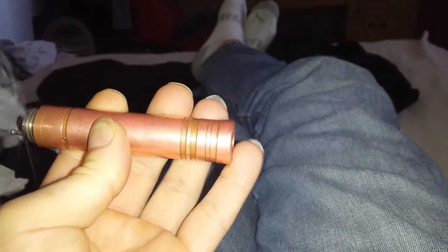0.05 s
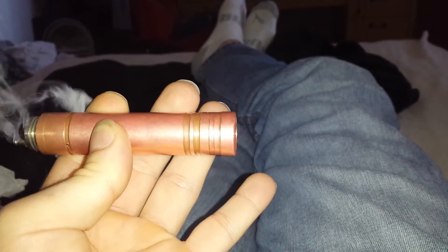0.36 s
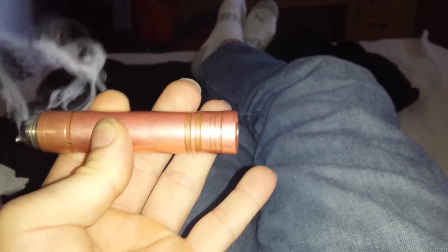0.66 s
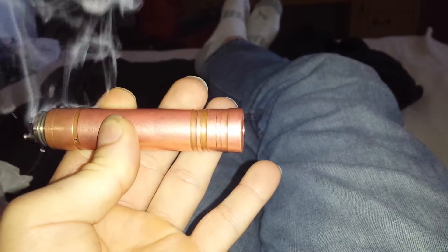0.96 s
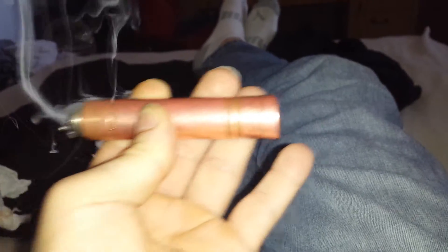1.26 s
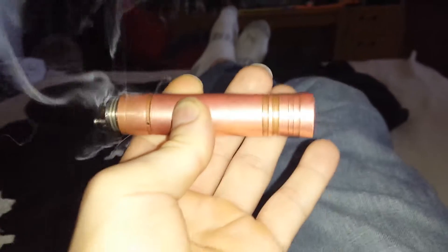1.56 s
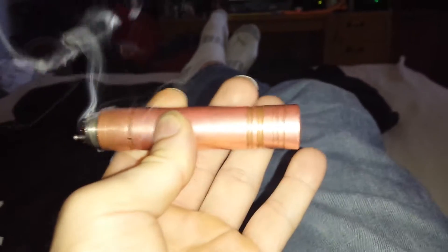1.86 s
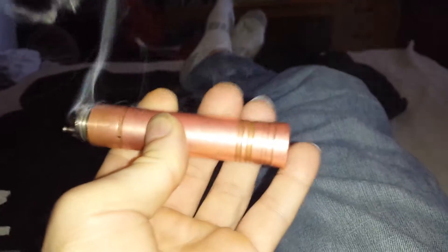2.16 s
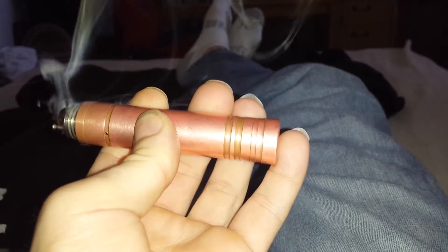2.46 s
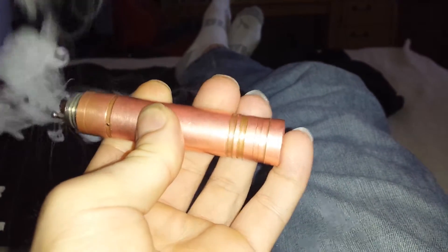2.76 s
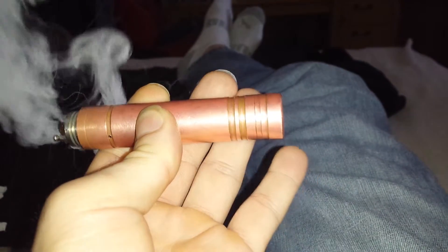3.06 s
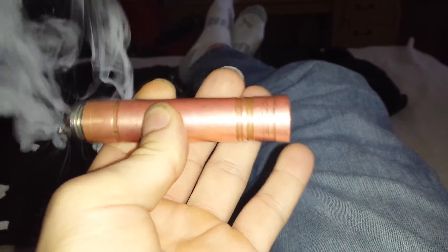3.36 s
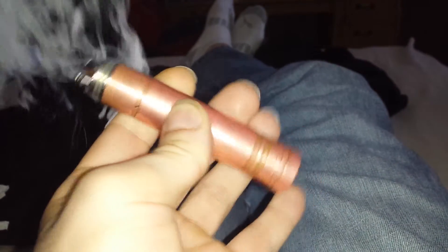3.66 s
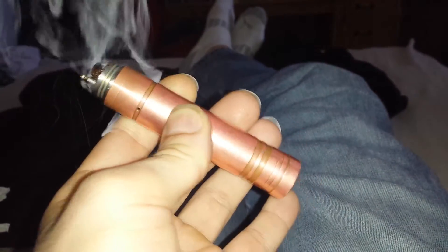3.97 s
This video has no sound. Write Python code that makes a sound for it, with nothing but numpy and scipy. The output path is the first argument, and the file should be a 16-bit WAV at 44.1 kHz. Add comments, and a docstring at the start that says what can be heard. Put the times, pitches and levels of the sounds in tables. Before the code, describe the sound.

Close up in a quiet room, a vape coil crackles and pops, fades to a soft hiss, then sizzles again more strongly. There are a few soft hand bumps, while an engine drones through the walls, eases off and builds.

```python
"""The wet coil of a hand-held vape sizzles close by in a quiet room and spits sharp pops as drops of liquid
burst. It dies down while a sleeve slides softly over denim, then is fired again at about 2.5 s and pops some
more. The hand bumps softly a few times. Behind it drones what seems to be an engine outside, muffled by the
walls: it pulls, eases off, then pulls again and grows louder."""
import sys
import numpy as np
from scipy import signal
from scipy.fft import rfft, irfft
from scipy.io import wavfile

SR = 44100
rng = np.random.default_rng(int(sys.argv[2]) if len(sys.argv) > 2 else 0)


def transcribe(u):
    """Save the signal u as a 16-bit wav file named by the first command-line argument.

    u: samples, shape (n,) or (channels, n), limited to [-1, 1]; the rate is SR.
    q: integer samples, one column per channel.
    """
    v = np.clip(np.atleast_2d(u).T, -1, 1)
    q = np.round(v * 32767).astype(np.int16)
    wavfile.write(sys.argv[1], SR, q)


N = 176400
T = np.arange(N) / SR
COIL_LEFT_LAG_S = 0.00024
# How hard the coil boils. Each row: time in seconds, level in dB.
BOIL = [(0, -53.5), (.1, -50.5), (.18, -50), (.23, -56), (.4, -58), (.7, -63), (1.15, -61), (1.45, -58),
        (1.66, -67), (2.3, -79), (2.42, -56.5), (2.58, -51), (2.8, -44), (2.92, -44.5), (3.1, -46),
        (3.5, -47.5), (3.62, -47.5), (3.75, -49.5), (4, -54)]


def amp(db):
    """Decibels to gain."""
    return 10 ** (np.asarray(db) / 20)


def unit(x):
    """Scales to rms 1."""
    return x / np.sqrt(np.mean(x ** 2) + 1e-20)


def curve(table, column=1):
    """One column of a time table, at every sample."""
    rows = np.array(table)
    return np.interp(T, rows[:, 0], rows[:, column])


def spectrum(table, size, column=1):
    """One dB column of a spectrum table, as gains on FFT bins."""
    rows = np.array(table)
    log_hz = np.log(np.fft.rfftfreq(size, 1 / SR) + 1)
    return amp(np.interp(log_hz, np.log(rows[:, 0]), rows[:, column]))


def colour(x, table, column=1):
    """Filters by one column of a spectrum table."""
    return irfft(rfft(x) * spectrum(table, N, column), N)


def noise(table, column=1):
    """Noise with the given spectrum."""
    return colour(rng.standard_normal(N), table, column)


def drift(hz):
    """Random movement of rms 1, rolling off around hz."""
    rolloff = (1 + (np.fft.rfftfreq(N, 1 / SR) / hz) ** 2) ** 2
    return unit(irfft(rfft(rng.standard_normal(N)) / rolloff, N))


def later(x, delay_s):
    """Delays a sound."""
    return np.pad(x, (round(delay_s * SR), 0))[:len(x)]


def add(track, centre_s, sound):
    """Mixes in a short sound centred on a time."""
    start = round(centre_s * SR) - len(sound) // 2
    track[start:start + len(sound)] += sound


def sizzle(hand_echo_s=0.0017, hand_echo_db=-14, shared=0.45):
    """Countless tiny bubbles merge into a fluttering hiss that follows the boil."""
    # Each row: frequency in Hz, left gain in dB, right gain in dB.
    bands = [(300, -6, -4), (1200, -8.5, -7.5), (2040, -5, -3), (2800, -2, -10), (3440, -10.5, -10),
             (4430, -2.5, -6), (4900, -2, -1), (5030, -0.5, -6), (6170, -0.5, -1), (7100, -7, -1.5),
             (8340, -16, -0.5), (9540, -17, -5.5), (9900, -11, -3), (11700, -14, -5.5), (14400, -21, -8),
             (14800, -50, -40)]
    white = rng.standard_normal((2, N))
    direct, scattered = [side + amp(hand_echo_db) * later(side, hand_echo_s) for side in white]
    left = shared * later(direct, COIL_LEFT_LAG_S) + np.sqrt(1 - shared ** 2) * scattered
    hiss = unit(np.array([colour(left, bands, column=1), colour(direct, bands, column=2)]))
    flutter_db = 0.56 * drift(hz=150) + 0.5 * drift(hz=44)
    return hiss * amp(curve(BOIL) + flutter_db)


def engine_drone():
    """Harmonics of the firing cycle, each wavering in level."""
    # Each row: time in seconds, cycle rate in Hz, levels of harmonics 2, 3 and 4 in dB.
    firing = [(0.0, 46.99, -71, -51, -89), (0.23, 48.14, -55.5, -59, -70), (0.37, 49.55, -44, -45.5, -60),
              (0.51, 50.82, -48, -56, -53), (0.58, 50.82, -41, -54, -80), (0.61, 50.27, -39.5, -43, -49),
              (0.76, 50.8, -34, -48, -42.5), (0.83, 51.42, -35, -46, -53), (0.92, 51.88, -37.5, -42.5, -40),
              (1.1, 50.77, -37.5, -53, -46), (1.15, 51.71, -33.5, -60, -65), (1.18, 51.61, -36.5, -58, -48),
              (1.25, 51.7, -35.5, -44.5, -38.5), (1.41, 51.27, -43.5, -50.5, -50),
              (1.46, 50.39, -51, -52, -44), (1.53, 49.91, -48, -79, -61), (1.57, 44.39, -53, -45, -51),
              (1.76, 44.2, -59, -53, -53), (2.03, 45.07, -61, -54, -56.5), (2.36, 47.12, -59, -45, -58),
              (2.62, 48.66, -37, -47.5, -52), (2.85, 49.66, -40.5, -48, -42), (3.15, 50.5, -39.5, -55, -38),
              (3.31, 51.24, -37.5, -41.5, -46), (3.53, 52.1, -32.5, -42, -30),
              (3.9, 53.57, -27.5, -34.5, -26), (4.0, 53.46, -28.5, -35, -24.5)]
    # Each row: time in seconds, levels of harmonics 5, 6 and 7 in dB.
    middle = [(0, -69, -73, -80), (.5, -61, -63.5, -64), (1, -55.5, -60, -62.5), (1.5, -60, -58.5, -67.5),
              (2.1, -59, -63.5, -56), (2.5, -55, -57, -58), (2.95, -47, -63, -63),
              (3.25, -44.5, -61, -40.5), (3.45, -66, -37.5, -45.5), (3.6, -55, -39.5, -42.5),
              (3.85, -41, -29.5, -34.5), (4, -54, -34.5, -35.5)]
    # Upper harmonics. Each row: time in seconds, common level in dB.
    upper_level = [(0, -71), (.5, -61), (.95, -53), (1.4, -61), (1.7, -62), (2.1, -59), (2.6, -47),
                   (3, -38), (3.2, -35), (3.45, -33.5), (3.6, -31), (3.85, -30), (4, -32)]
    # Each row: harmonic number, offset from that level in dB.
    upper = [(8, -23.5), (9, -20), (11, -25.5), (13, -28), (16, -28), (18, -28), (19, -26), (25, -27)]
    cycles = np.cumsum(curve(firing)) / SR

    def harmonic(k, db, waver_db):
        peak = np.sqrt(2) * amp(db + waver_db * drift(hz=5))
        return peak * np.sin(2 * np.pi * (k * cycles + rng.random()))

    drone = sum(harmonic(k, curve(firing, column=k), waver_db=1.2) for k in (2, 3, 4))
    drone += sum(harmonic(k, curve(middle, column=k - 4), waver_db=2) for k in (5, 6, 7))
    return drone + sum(harmonic(k, curve(upper_level) + db, waver_db=2) for k, db in upper)


def vehicle(drone_db=-1.5, bass_lag_s=0.00016, rush_pan_db=2):
    """The engine's drone over a low rumble and a diffuse rush, muffled by the walls."""
    # Each row: time in seconds, rumble level in dB, rush level in dB.
    levels = [(0, -56, -72), (.35, -57, -69), (.52, -51, -63.5), (.68, -55.5, -63.5), (.95, -48.5, -64),
              (1.25, -54, -55.5), (1.45, -55, -63), (1.65, -52, -64.5), (1.9, -51, -57), (2.15, -51, -60),
              (2.4, -48.5, -61), (2.8, -40.5, -53), (3.2, -40.5, -48.5), (3.5, -38.5, -45.5),
              (3.8, -34, -44), (4, -39, -44.5)]
    # Noise spectra. Each row: frequency in Hz, gain in dB.
    rumble_bands = [(20, -25), (65, -20), (90, -6.5), (108, 6.5), (124, 2.5), (160, -3.5), (200, -1.5),
                    (238, -1), (280, -4), (318, 2), (345, -2.5), (400, -9), (485, -3.5), (545, -19.5),
                    (900, -25), (2000, -70)]
    rush_bands = [(200, -22), (500, 0), (770, -4), (980, -0.5), (1150, 1.5), (1450, 1), (1750, -5.5),
                  (2100, -7), (3000, -15), (5000, -19), (12000, -50)]
    # Each row: frequency in Hz, left minus right in dB.
    balance = [(60, -10.5), (100, 2), (160, 2.5), (220, -0.25), (450, 0), (800, 0.5)]
    bass = amp(drone_db) * engine_drone() + unit(noise(rumble_bands)) * amp(curve(levels))
    bass_left = later(colour(bass, balance), bass_lag_s)
    rush = unit(np.array([noise(rush_bands), noise(rush_bands)])) * amp(curve(levels, column=2))
    return np.array([bass_left, bass]) + rush * amp([[rush_pan_db], [-rush_pan_db]])


def room_tone(level_db=-58, whine_gain_db=1.5):
    """Steady room noise and faint hiss, with a thin whine on the right."""
    # Each row: frequency in Hz, gain in dB.
    bands = [(20, 11), (100, 16.5), (400, 8.5), (800, 8), (1500, -0.5), (2800, 0.5), (5500, 2.5),
             (8500, -1.5), (14300, -3), (15000, -40)]
    # Each row: frequency in Hz, level in dB.
    whine = [(7510, -78), (8080, -73), (8662, -74), (9254, -73), (9819, -72), (10406, -77)]
    tone = amp(level_db) * unit(np.array([noise(bands), noise(bands)]))
    for hz, db in whine:
        tone[1] += amp(db + whine_gain_db) * np.sqrt(2) * np.sin(2 * np.pi * hz * T + drift(hz=29))
    return tone


def drop(tilt_db_per_octave, ping_hz, pivot_hz=6950, ping_db=-17.5, ping_t60_s=0.0022, size=256):
    """One drop bursts: a click at mid-buffer, then a brief ping at the drop's own pitch."""
    hz = np.clip(np.fft.rfftfreq(size, 1 / SR), pivot_hz / 2, pivot_hz * 2)
    click = np.roll(irfft(amp(tilt_db_per_octave * np.log2(hz / pivot_hz))), size // 2)
    t = T[:size // 2]
    ping = amp(ping_db - 60 * t / ping_t60_s) * np.cos(2 * np.pi * ping_hz * t)
    return click + np.pad(ping, (size // 2, 0))


def snap(size=512):
    """The sharp edge of a pop: a minimum-phase click of peak 1."""
    # Each row: frequency in Hz, gain in dB.
    bands = [(100, -29), (700, -18), (2000, -19), (3500, -10), (5000, -4), (6200, 1), (7800, 4),
             (10500, 4.5), (14000, -7.5), (15500, -20)]
    cepstrum = irfft(np.log(spectrum(bands, size)))
    cepstrum[1:size // 2] *= 2
    cepstrum[size // 2:] = 0
    click = irfft(np.exp(rfft(cepstrum)))
    return click / abs(click).max()


def ring(clicks, modes):
    """Clicks excite decaying modes of alternating sign."""
    t = T[:SR // 40]
    response = sum((-1) ** k * amp(db - 60 * t / t60_s) * np.sin(2 * np.pi * hz * t)
                   for k, (hz, db, t60_s) in enumerate(modes))
    return signal.oaconvolve(clicks, response)[:N]


def room(x, tail_db=-10, t60_s=0.084, rise_s=0.0082):
    """Adds reflections from the body and the furniture, and a short soft tail."""
    # Each row: delay in seconds, gain in dB.
    echoes = [(.0009, -33), (.0062, -43), (.0068, -14.5), (0.009, -48)]
    t = T[:SR // 2]
    tail = rng.standard_normal((2, len(t))) * amp(-60 * t / t60_s) * np.minimum(t / rise_s, 1)
    tail /= np.linalg.norm(tail[0])
    early = np.array([sum(amp(db) * later(side, delay_s) for delay_s, db in echoes) for side in x])
    return x + early + amp(tail_db) * signal.fftconvolve(x, tail, axes=1)[:, :N]


def crackle(per_s=160, offset_db=-1, spread_db=3.5):
    """Small drops burst at random: impulses whose size follows the boil."""
    scatter_db = spread_db * np.minimum(rng.exponential(1, N), 4)
    return amp(offset_db + curve(BOIL) + scatter_db) * (rng.random(N) < per_s / SR)


def pops(drop_gain_db=3, lead_s=0.001182):
    """Bursting drops ring and snap, the snap strongest on the right; large ones click twice and knock."""
    # Each row: start in seconds, level in dB, first click and knock in dB re the main click,
    # tilt in dB per octave, ping in Hz.
    large_drops = [(.0298, -37, -3, -26, -2, 7000), (0.106, -29, -16, -2, 0, 6960),
                   (.1215, -39, -3, -6, 0, 6000), (0.1445, -35.5, -8, -10, 3, 7000),
                   (0.1652, -25.5, -6.5, -5, -3, 7200), (0.1758, -38, -3, -9, -5, 6500),
                   (2.371, -39, -21, -2, -3, 4500), (2.5776, -29.5, -8, -8, -1.5, 5300),
                   (2.6589, -31.5, -14, -17, -1, 8200), (2.7302, -32, -4, 0, -1, 8000),
                   (2.7828, -17, -11, -6.5, 4, 4830), (2.8774, -22.5, -11, -12, -4, 8300),
                   (2.8983, -18.5, -15, -24, 0, 7900), (2.9374, -31.5, -12, -14, 0, 8250),
                   (3.0049, -30, -10, -4, -3, 7800), (3.1383, -39, -12, 0, -5, 5000),
                   (3.2251, -23.5, -20, -11, -7, 8550), (3.3912, -25.5, -20, -8, -7, 5070),
                   (3.4431, -34, -12, -14, -7, 4800), (3.5874, -16.5, -16, -11, 0.5, 11900)]
    # Bright ring and dull knock. Each row: frequency in Hz, gain in dB, T60 in seconds.
    ring_modes = [(2550, -23.5, 0.0095), (4510, -13, 0.0042), (5700, -9, 0.0032), (7230, -7.5, 0.00088),
                  (11100, -14.5, 0.0027)]
    knock_modes = [(430, -19.5, 0.016), (701, -20.5, 0.033), (1250, -24.5, 0.021), (2050, -21, 0.019),
                   (2600, -13.5, 0.0011)]
    bursts, knocks = crackle(), np.zeros(N)
    for start_s, db, first_db, knock_db, tilt_db_per_octave, ping_hz in large_drops:
        click = amp(drop_gain_db + db) * drop(tilt_db_per_octave, ping_hz)
        add(bursts, start_s, amp(first_db) * click)
        add(bursts, start_s + lead_s, click)
        add(knocks, start_s + lead_s, amp(knock_db) * click)
    ringing = ring(bursts, ring_modes)
    snaps = -signal.oaconvolve(bursts, snap())[:N]
    left = later(amp(4.5) * ringing + amp(-10.5) * snaps, COIL_LEFT_LAG_S)
    right = amp(2) * ringing + amp(4) * snaps
    return room(np.array([left, right]) + ring(knocks, knock_modes))


def hand_bumps():
    """Soft bumps of the hand, each a short swell of a low tone."""
    # Each row: centre in seconds, pitch in Hz, 1/e half-width in seconds, level in dB.
    bumps = [(0.489, 298, 0.022, -49.5), (0.555, 368, 0.049, -52), (0.57, 412, 0.019, -48),
             (1.648, 131, 0.024, -35.5), (2.439, 310, 0.024, -42)]
    mono = sum(amp(db) * np.exp(-((T - at_s) / width_s) ** 2) * np.sin(2 * np.pi * hz * (T - at_s))
               for at_s, hz, width_s, db in bumps)
    return np.array([mono, mono])


def soft_hiss(centre_s=1.405, half_width_s=0.19, level_db=-54.5):
    """A sleeve slides over denim: one smooth swell of hiss between the coil's two firings."""
    # Each row: frequency in Hz, left gain in dB, right gain in dB.
    bands = [(500, -23, -11), (2600, -1, -12), (3500, -2.5, -3), (4900, -3, -6), (6040, 0, -7),
             (7200, 0, 1), (8300, -6, -6), (9800, -16, -12), (14200, -20, -15), (15000, -45, -40)]
    hiss = unit(np.array([noise(bands, column=1), noise(bands, column=2)]))
    return amp(level_db) * hiss * np.exp(-((T - centre_s) / half_width_s) ** 2)


def scene():
    """Coil and hand in front, vehicle and room behind."""
    return pops() + sizzle() + soft_hiss() + hand_bumps() + vehicle() + room_tone()


def record(dry):
    """Steep low-pass on both channels."""
    cutoff_hz = 15600
    taps = signal.firwin(255, cutoff_hz, window=("kaiser", 8), fs=SR)
    return signal.oaconvolve(dry, taps[None], "same")


dry = scene()
out = record(dry)
transcribe(out)
```